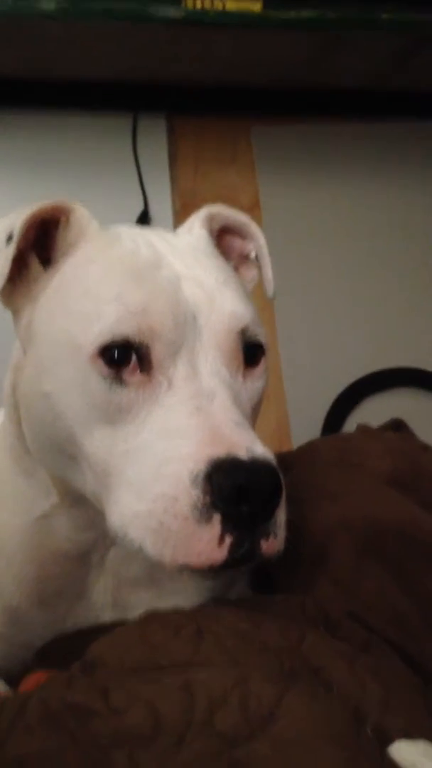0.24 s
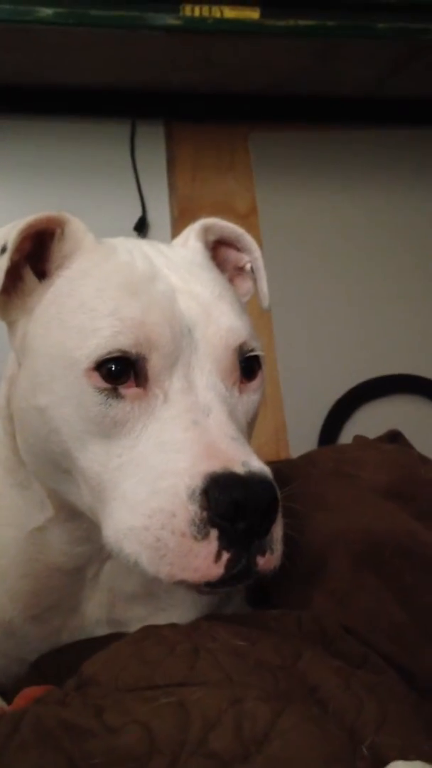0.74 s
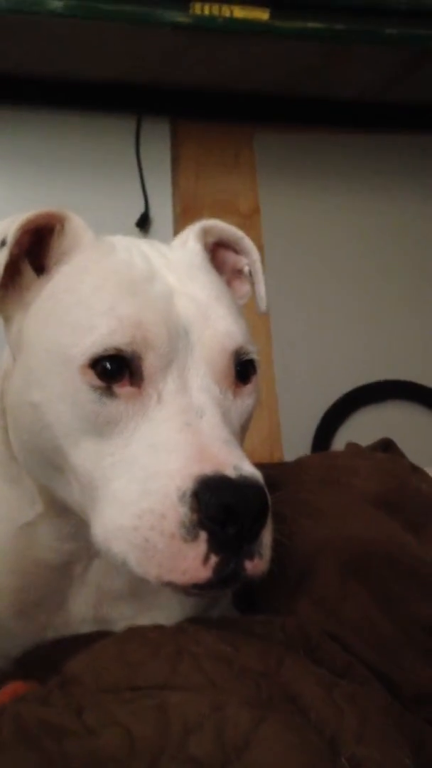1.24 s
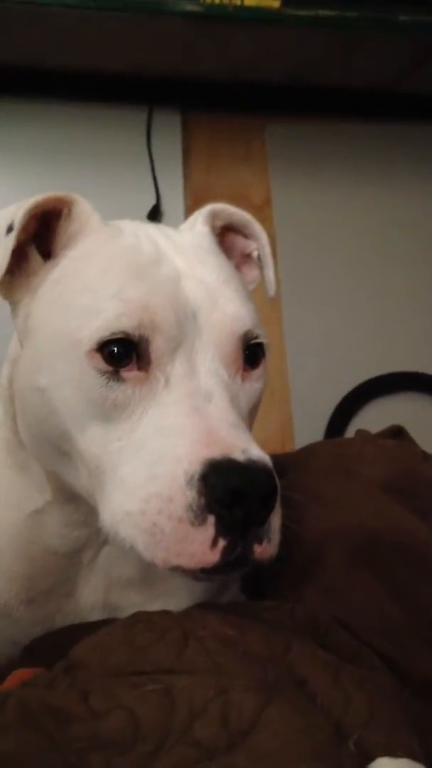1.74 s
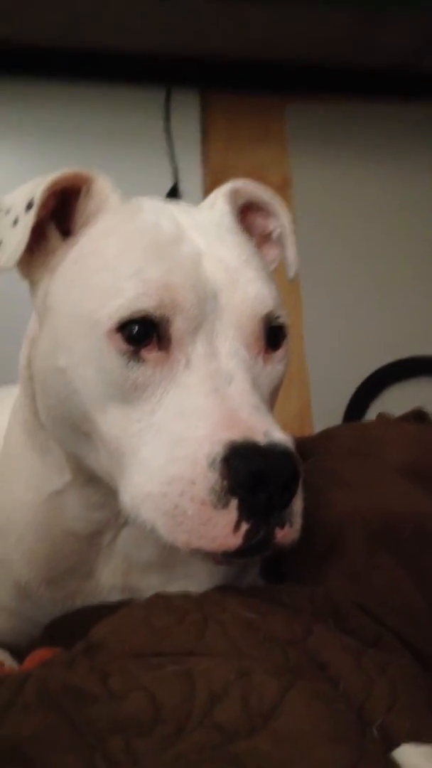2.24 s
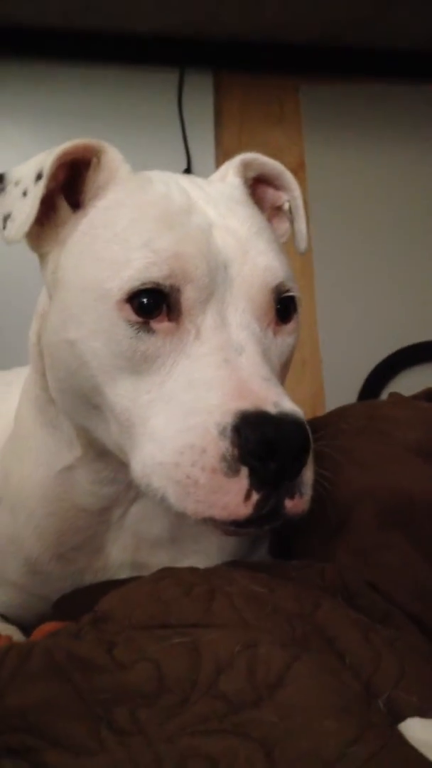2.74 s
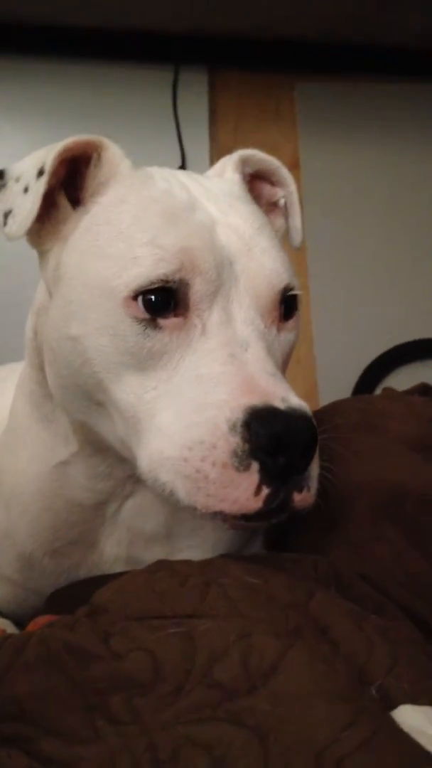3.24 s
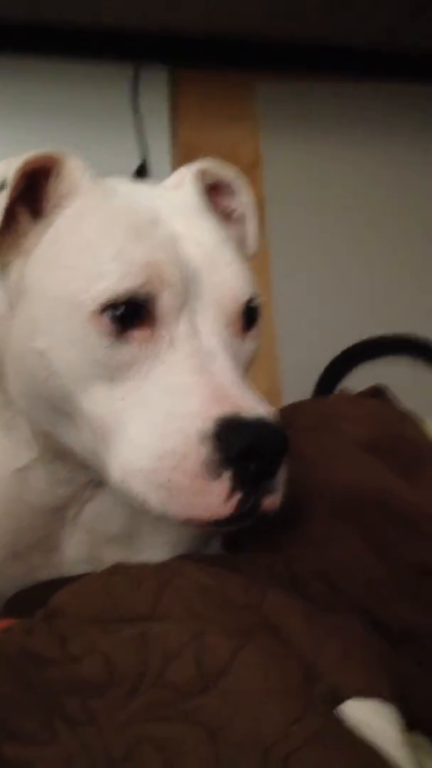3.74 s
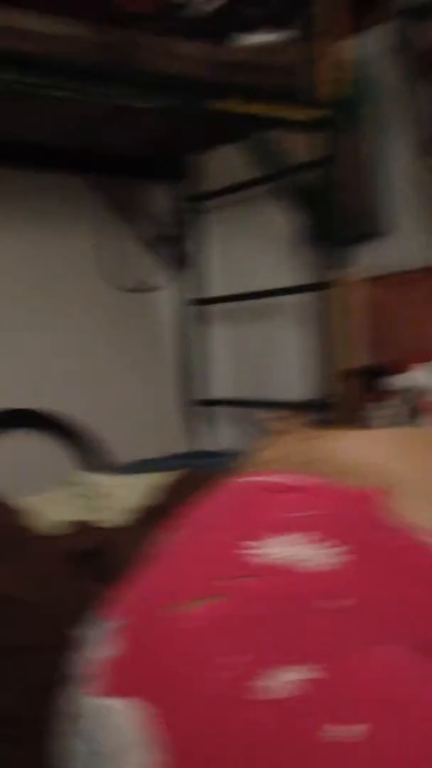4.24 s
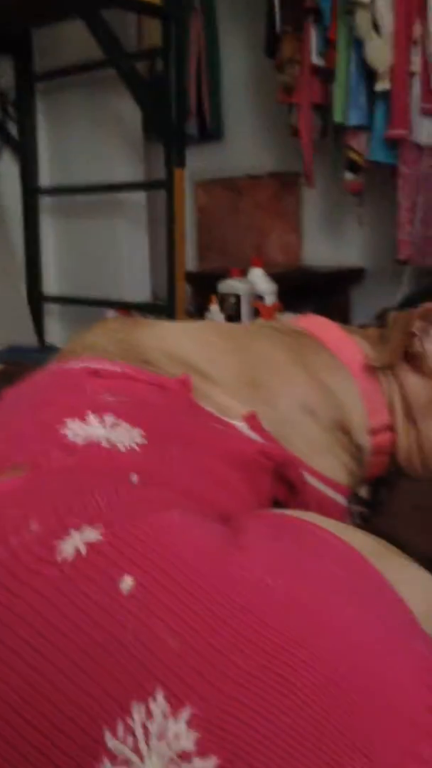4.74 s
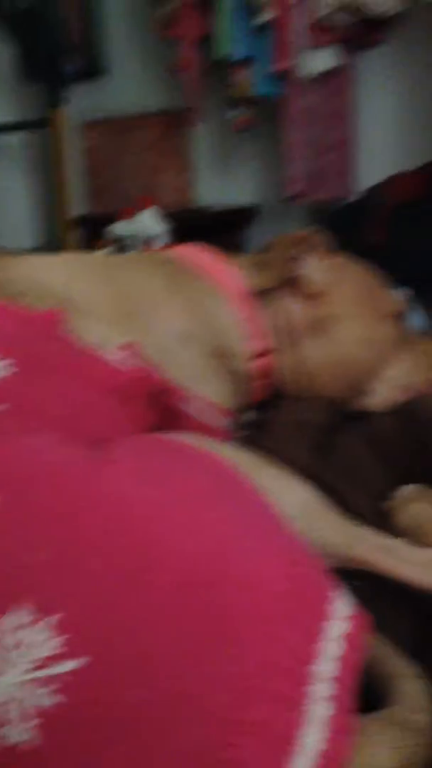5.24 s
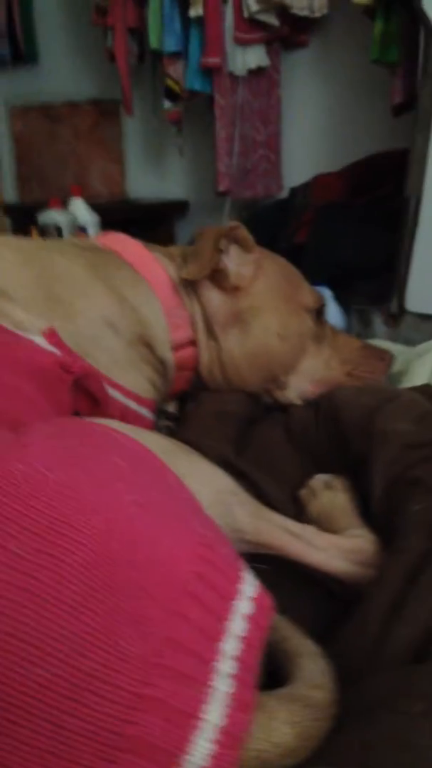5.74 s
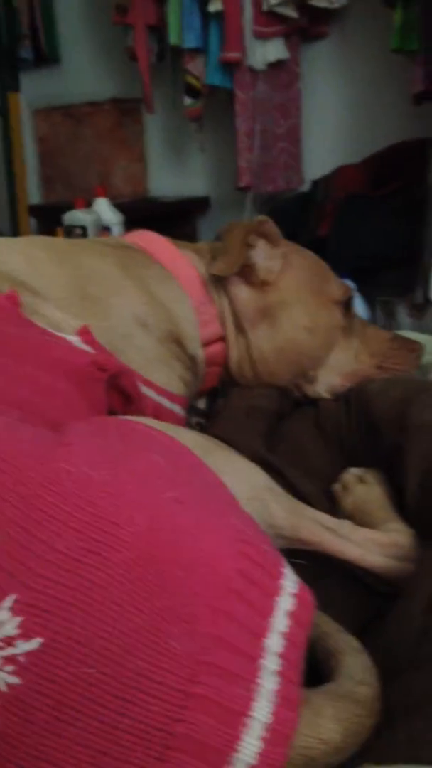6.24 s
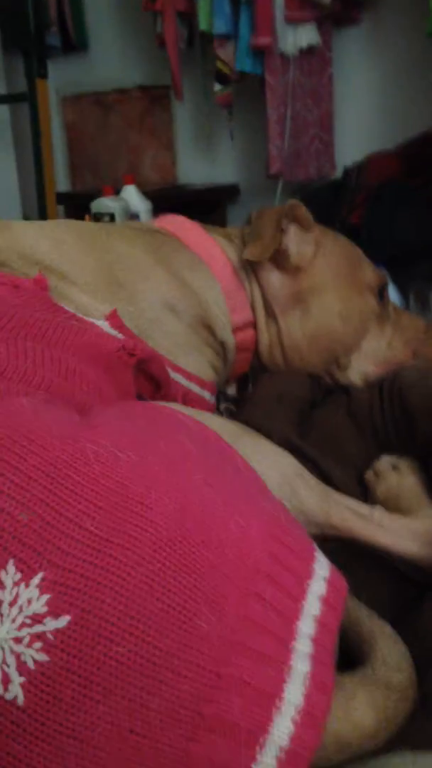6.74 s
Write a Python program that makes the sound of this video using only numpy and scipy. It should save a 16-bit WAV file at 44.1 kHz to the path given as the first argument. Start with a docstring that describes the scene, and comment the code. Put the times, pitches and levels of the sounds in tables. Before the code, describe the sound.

A dog close to a small microphone in a soft, bedding-filled room. Faint puffs lead into a long, low, rumbling growl with irregular wet clicks. One short muffled woof cuts across it, and the growl sinks lower. A quieter, slow rattling breath in follows, then a second growl starts higher and louder, sinking until the end.

```python
"""A dog growls low in a small soft room. Three soft puffs lead into the first long growl, where the vocal
folds beat about 84 to 110 times a second and the soft palate flaps and clicks. One short muffled woof, a hollow
tone with rough mid resonances and a gust of air, cuts across it at 2.4 s. At 3.5 s comes a rattling breath in,
made of slow uneven beats and a faint hiss. The second growl starts higher, near 4.7 s, and lasts to the end."""
import sys
import numpy as np
from scipy import signal
from scipy.io import wavfile
from scipy.ndimage import uniform_filter1d

SR = 44100
rng = np.random.default_rng(int(sys.argv[2]) if len(sys.argv) > 2 else 0)


def wav_out(sig):
    """Save sig, one row per channel (or a flat mono array), as 16-bit PCM at SR to the path in sys.argv[1]."""
    wavfile.write(sys.argv[1], SR, np.round(np.clip(np.atleast_2d(sig).T, -1, 1) * 32767).astype(np.int16))


N = 307377

# the course of each growl; the ring is the sound above the chest tone:
# start_s, pitch_hz, chest_level_db, ring_level_db
GROWL_COURSES = [
    [(0.21, 90.1, -71, -100), (0.25, 89.7, -39.5, -63.5), (0.47, 95.23, -42.5, -54),
     (0.53, 103.8, -34.5, -51), (0.7, 109.9, -31.5, -49), (0.94, 109.9, -34.5, -49),
     (1.26, 104.6, -35.5, -50.5), (1.64, 100.4, -42, -51), (1.9, 102.9, -40.5, -53), (1.97, 93.3, -43, -52),
     (2.43, 92.18, -41, -54.5), (2.68, 84.9, -42, -60), (2.86, 86.3, -40, -58), (3.03, 83.8, -41, -60.5),
     (3.28, 84.46, -43, -62), (3.46, 85.35, -39.5, -57), (3.53, 85.9, -53, -75)],
    [(4.71, 114.9, -71, -110), (4.74, 111.3, -37.5, -57.5), (4.82, 121.8, -32.5, -48.5),
     (5.01, 121.4, -29.5, -49), (5.23, 122.3, -32.5, -50.5), (5.4, 116.8, -37.5, -52),
     (5.75, 114.3, -39, -50.5), (6.09, 115.7, -42.5, -54), (6.14, 107.3, -38, -51.5),
     (6.28, 99.6, -43, -51.5), (6.5, 95.3, -44.5, -54.5), (6.97, 97.05, -43, -52)],
]


def gain_of(db):
    """Turns decibels into amplitude."""
    return 10 ** (np.asarray(db) / 20)


def evened(x):
    """Scales a sound to an average (rms) level of 1."""
    return x / np.sqrt(np.mean(x ** 2) + 1e-20)


def steadied(x):
    """Divides out slow level changes, so that a control curve alone sets the loudness."""
    return x / np.sqrt(uniform_filter1d(x ** 2, SR // 5) + 1e-20)


def add(mix, s, sound):
    """Mixes a sound in at second s."""
    part = mix[round(s * SR):][:len(sound)]
    part += sound[:len(part)]


def unroll(rows):
    """Gives the time axis and every column of a table, sample by sample."""
    s, *columns = np.transpose(rows)
    t = np.arange(s[0], s[-1], 1 / SR)
    return [t] + [np.interp(t, s, column) for column in columns]


def wander(count, seconds):
    """Smooth random curve of rms 1 that changes over about the given time."""
    size = max(round(seconds * SR), 2)
    smooth = uniform_filter1d(rng.standard_normal(count), size)
    return evened(uniform_filter1d(smooth, size))


def beats(turns, spread_db):
    """One click at each full turn, each with its own random strength."""
    whole = np.floor(turns).astype(int)
    strength = gain_of(spread_db * rng.standard_normal(whole[-1] + 1)[whole])
    return np.diff(whole, prepend=whole[0]) * strength


def colour(x, points, causal=1):
    """Filters to a drawn spectrum; causal=1 lets the response only follow, 0 makes it symmetric in time."""
    f, db = np.transpose(points)
    hz = abs(np.fft.fftfreq(16384, 1 / SR))
    log_gain = np.log(gain_of(np.interp(np.log(hz + 1), np.log(f + 1), db)))
    analytic = np.conj(signal.hilbert(log_gain))  # the imaginary part is the phase that fits the gain
    taps = np.fft.ifft(np.exp(analytic.real + 1j * causal * analytic.imag)).real
    return signal.oaconvolve(x, np.fft.fftshift(taps))[len(taps) // 2:][:len(x)]


def resonate(x, hz, width, lag=0):
    """Shifts the curve hz down to zero, smooths twice, and shifts back: a steep resonance of gain 1."""
    turn = np.exp(2j * np.pi * np.cumsum(hz * np.ones(len(x))) / SR)
    r = np.exp(-np.pi * width / SR)
    smooth = signal.lfilter([(1 - r) ** 2], [1, -2 * r, r * r], x / turn + 1e-18)
    return 2 * (turn * np.exp(-1j * lag) * smooth).real


def cavity(x, modes):
    """Hollow space: a sum of fixed resonances with alternating sign."""
    return sum((-1) ** k * gain_of(db) * resonate(x, hz, width) for k, (hz, width, db) in enumerate(modes))


def starting_puffs():
    """Soft puffs before the folds catch: short swells of a 115 Hz tone."""
    # start_s, level_db (at the peak of the swell)
    puff_starts = [(0.117, -57), (0.176, -58.5), (0.2, -60)]
    t = np.arange(SR // 50) / SR
    puff = np.sin(2 * np.pi * 115 * t) * np.hanning(len(t))
    return [(s, gain_of(db) * puff) for s, db in puff_starts]


def fold_beats(hz, rough, narrow):
    """Vocal folds open and shut: turns of their cycle, which drag while the airway is narrow."""
    drag = .14  # share of pitch lost while narrow
    slowed = 1 - drag * (narrow - uniform_filter1d(narrow, SR // 10))
    uneven = 1 + 0.18 * rough * wander(len(hz), 0.0063)
    return 0.7 + np.cumsum(hz * slowed * uneven) / SR


def muzzle_ring(breathy, narrow, muzzle_hz):
    """The muzzle rings on the folds' pulses; its upper resonances throb with the flaps."""
    # lower and upper resonances in turn: pitch_hz, width_hz, gain_db
    muzzle_modes = [(506, 208, 3), (1193, 414, -15.5), (760, 120, -14), (1448, 247, -14.5)]
    throb = gain_of(-4.5 + 11. * narrow)
    lower = cavity(breathy, muzzle_modes[::2])
    upper = cavity(breathy * throb, muzzle_modes[1::2])
    return steadied(lower - upper - resonate(breathy, muzzle_hz, 136))


def whistles(t, airy, puffs, narrow):
    """Air rings in narrow passages that open as the head turns."""
    # one list per passage: start_s, pitch_hz, level_db
    passages = [
        [(5.75, 4020, -78), (5.85, 4050, -74), (6.08, 4700, -77), (6.15, 4066, -77), (6.4, 4137, -82)],
        [(6.1, 1950, -76), (6.15, 1908, -70), (6.42, 2000, -82)],
    ]
    total = np.zeros(len(t))
    for s, pass_hz, db in map(np.transpose, passages):
        blown = airy * (puffs + .02 + 2 * narrow)
        passage = evened(resonate(blown, np.interp(t, s, pass_hz), 260))
        total += gain_of(np.interp(t, s, db, -150, -150)) * passage
    return total


def growl(rows, narrowing):
    """Fold pulses ring chest, throat and muzzle; a puff of air follows each pulse through the nose."""
    # how well each pitch meets the throat, in dB against the ring level:
    # pitch_hz, second_partial_db, throat_ring_db, flap_thud_db
    pitch_fit = [(84.46, 13, 6.2, 14), (94.5, 11, 2.3, 7.5), (102.5, 11, 5.4, 2.5), (104.8, 8, 7.8, 4),
                 (108.8, 6.5, 9.8, 7.5), (113.8, 3, 10.7, -0.5), (120.9, -5, 10.4, 4.5)]
    # tongue and jaw, the last two in dB against the ring level:
    # start_s, muzzle_resonance_hz, roughness (0-1), sinus_db, nose_air_db
    jaw_moves = [(0.25, 687, 0.18, -31, -15.5), (0.5, 701, .15, -28, -19.5), (1.4, 689, 0.12, -22, -21.5),
                 (2.1, 700, 0.12, -32, -23.5), (2.7, 695, 0.24, -22.5, -16.5), (3.5, 663, 0.29, -24, -26.5),
                 (4.72, 802, 0.2, -24, -18.5), (4.899, 679, 0.12, -26.5, -19),
                 (5.402, 580, 0.12, -27.5, -17), (5.9, 682, 0.089, -26.5, -21.5),
                 (6.97, 683, 0.14, -29, -21.5)]
    # resonances of throat, sinus and nose: pitch_hz, width_hz, gain_db (before each sum is steadied)
    throat_modes = [(336, 37.3, 4.5), (382, 70, -11.5)]
    sinus_modes = [(2657, 250, 1.5), (3426, 440, -8)]
    nose_modes = [(4090, 320, -3.5), (5170, 620, 2.5), (5990, 680, -3.5), (8460, 4000, -18.5),
                  (9700, 430, -18), (12350, 1700, -13)]

    t, hz, chest_db, ring_db = unroll(rows)
    pitch, *levels = np.transpose(pitch_fit)
    second_db, throat_db, thud_db = [np.interp(hz, pitch, db) for db in levels]
    s, *moves = np.transpose(jaw_moves)
    muzzle_hz, rough, sinus_db, nose_db = [np.interp(t, s, move) for move in moves]
    narrow = np.interp(t, np.arange(N) / SR, narrowing)

    turns = fold_beats(hz, rough, narrow)
    pulses = beats(turns, 8 * rough) * gain_of(-4.5 * narrow)
    puffs = signal.lfilter([1], [1, -np.exp(-1 / (0.0012 * SR))], pulses)  # each fades over 1.2 ms
    noise = rng.standard_normal(len(t))
    breathy = pulses + .032 * (puffs + .5) * noise
    airy = .5 * pulses + .17 * (puffs ** 2 + .12) * noise

    chest = steadied(resonate(pulses, hz, 85, lag=.45))
    # the pulse that meets a flap thuds in the pharynx
    slaps = -beats(turns, 0) * narrow + 0.0078 * noise
    ring = gain_of(thud_db) * evened(resonate(slaps, 1.5 * hz, 65, lag=.5))
    ring += gain_of(second_db) * steadied(resonate(pulses, 2 * hz, 63, lag=0.18))
    ring += gain_of(throat_db) * steadied(cavity(pulses + .009 * noise, throat_modes))
    ring += muzzle_ring(breathy, narrow, muzzle_hz)
    ring += gain_of(sinus_db) * steadied(cavity(airy, sinus_modes))
    ring += gain_of(nose_db) * steadied(cavity(airy, nose_modes))

    fade = np.minimum(np.minimum(t - t[0], t[-1] - t) / 0.0037, 1)  # 3.7 ms at both ends
    voice = (gain_of(chest_db) * chest + gain_of(ring_db) * ring) * fade
    return t[0], voice + whistles(t, airy, puffs, narrow)


def all_flaps():
    """Lists the strong palate flaps and evenly spaced weaker ones between them."""
    # strong flaps: start_s, click_db (strength before the click resonances)
    strong_flaps = [(0.3562, -89), (0.5684, -60), (0.6519, -56.5), (0.698, -56.5), (0.7435, -60.5),
                    (0.923, -62), (0.9699, -58), (1.0621, -57), (1.165, -59), (1.2599, -60),
                    (1.4069, -61.5), (1.5064, -59.5), (1.6584, -62.5), (1.876, -64.5), (1.9781, -61),
                    (2.1176, -62.5), (2.2933, -60.5), (2.3936, -71.5), (2.4957, -54), (2.6596, -66.5),
                    (2.8036, -70), (2.909, -66), (3.1377, -70.5), (3.4202, -66.5), (3.4923, -72),
                    (4.7814, -65), (4.8595, -57), (4.9823, -60), (5.1098, -60.5), (5.2319, -60.5),
                    (5.3233, -59.5), (5.4952, -62), (5.6806, -69), (5.9578, -60.5), (6.0778, -61),
                    (6.1196, -58.5), (6.3554, -61), (6.5234, -60.5), (6.5764, -60), (6.7903, -63),
                    (6.9452, -60.5)]
    flap_beats, rest_s = 4.8, .6  # flaps come about 4.8 fold beats apart; a gap of rest_s or more is a pause
    weak_db, weak_spread_db = -1.5, 3  # weaker flaps against the mean of their strong neighbours
    s, hz = np.concatenate(GROWL_COURSES)[:, :2].T
    rows = []
    for (start, db), (end, next_db) in zip(strong_flaps, strong_flaps[1:] + strong_flaps[-1:]):
        count = 1
        if end - start < rest_s:
            count = max(round((end - start) * np.interp(start, s, hz) / flap_beats), 1)
        chance = rng.standard_normal(8)[1:count]
        between_db = (db + next_db) / 2 + weak_db - weak_spread_db * abs(chance)
        rows += zip(np.linspace(start, end, count, endpoint=False), np.append(db, between_db))
    return rows


def palate():
    """Each flap of the soft palate narrows the airway for a moment and ends in a wet click."""
    # resonances of the click: pitch_hz, width_hz, gain_db
    click_modes = [(4077, 300, 22.3), (5200, 1400, 21.6), (8120, 410, 14.3)]
    s, db = np.transpose(all_flaps())
    at = np.round(s * SR).astype(int)
    clicks, blows = np.zeros(N), np.zeros(N)
    clicks[at], blows[at] = gain_of(db), 1
    narrowing = signal.oaconvolve(blows, signal.windows.hann(round(.018 * SR)), "same")
    narrowing = np.roll(narrowing, -round(0.0063 * SR))  # narrowest 6.3 ms ahead of the click
    fading = np.exp(-np.arange(400) / (0.00088 * SR))
    burst = signal.oaconvolve(clicks, fading)[:N] * rng.choice([-1., 1.], N)
    return narrowing, cavity(burst, click_modes)


def swell(t, peak_s, db, rise_db_s, hold_s, fall_db_s):
    """Level in dB: straight rise, hold, straight fall."""
    return db - rise_db_s * np.maximum(peak_s - t, 0) - fall_db_s * np.maximum(t - peak_s - hold_s, 0)


def woof():
    """A hollow tone first; the mouth opens on rough mid resonances and lets out a gust of air."""
    # hollow tone: start_s, level_db, pitch_hz
    hollow_tone = [(2.44, -41, 268.8), (2.465, -30, 278.4), (2.482, -30.5, 246.5), (2.498, -19, 239),
                   (2.511, -18.5, 285.5), (2.522, -28.5, 282), (2.538, -22, 273), (2.556, -25, 255),
                   (2.578, -44, 251), (2.61, -37.5, 274.6), (2.72, -67, 260.8)]
    # resonances of the open mouth: pitch_hz, width_hz, gain_db (before the sum is evened)
    mouth_modes = [(135.3, 45, 18), (374, 240, 8.5), (646, 153, -3), (848, 230, 4.5), (1140, 76, -12.5),
                   (1450, 150, -34)]
    # spectrum of the gust: frequency_hz, relative_level_db (per Hz)
    gust_spectrum = [(1000, -81), (1700, 0), (2500, -16.5), (2840, 4.5), (3480, -0.5), (3850, -6),
                     (4220, -5), (4630, -7.5), (15300, -24.5)]
    # level swells of mouth and gust: peak_s, level_db, rise_db_per_s, hold_s, fall_db_per_s
    mouth_swell = (2.514, -25, 1500, .022, 400)
    gust_swell = (2.535, -55, 280, .04, 330)

    t, tone_db, hz = unroll(hollow_tone)
    noise = rng.standard_normal((2, len(t)))
    tone = np.sqrt(2) * np.sin(2 * np.pi * np.cumsum(hz) / SR)
    mouth = evened(cavity(noise[0], mouth_modes))
    air = evened(colour(noise[1], gust_spectrum))
    sound = gain_of(tone_db) * tone
    sound += gain_of(swell(t, *mouth_swell)) * mouth
    sound += gain_of(swell(t, *gust_swell)) * air
    return t[0], sound * signal.windows.tukey(len(t), .2)


def rattle():
    """Breath drawn in over the slack palate: slow uneven beats that even out, with a faint hiss of air."""
    # chest and throat on the breath in: frequency_hz, relative_level_db
    inward_spectrum = [(40, -39), (85, 6), (135, 2.5), (200, -11), (280, 0), (340, -12.5), (430, -18),
                       (700, -32.5), (1200, -18)]
    # hiss resonances: pitch_hz, width_hz, gain_db
    hiss_modes = [(2510, 190, -64), (3500, 690, -66.5), (5250, 410, -80)]
    start_s, length_s, level_db = 3.5, 1.213, -50.5
    rise_s, stop_s = 0.039, 0.049
    sag_s, sag_db, beats_sag = 0.37, -6, 0.11  # level and share of beat rate lost as the breath runs out
    beats_per_s, settle_s = 41.5, .3  # beat rate before the sag
    uneven_start, uneven_end = .25, .05  # spread of the beat rate, as a share of it

    t = np.arange(0, length_s, 1 / SR)
    left = length_s - t
    sag = np.maximum(1 - left / sag_s, 0)
    uneven = uneven_end + (uneven_start - uneven_end) * np.exp(-(t / settle_s) ** 2)
    level = gain_of(level_db + sag_db * sag)
    level = level * np.minimum(np.minimum(t / rise_s, left / stop_s), 1)
    rate = beats_per_s * (1 - beats_sag * sag) * np.maximum(1 + uneven * wander(len(t), 0.015), .2)
    turns = np.cumsum(rate) / SR
    noise = rng.standard_normal(len(t))
    drive = -beats(turns, 1.2 + 5. * uneven) + .012 * noise
    blunt = signal.oaconvolve(drive, np.hanning(round(0.0014 * SR)), "same")  # soft tissue blunts the beats
    thumps = steadied(colour(blunt, inward_spectrum, causal=0.42))
    hiss = cavity(noise, hiss_modes) * signal.windows.tukey(len(t), .25)
    return start_s, level * thumps + hiss


def room(x):
    """Short tail of sparse random echoes: bedding and clothes soak up the sound fast."""
    taps = np.zeros(SR // 3)
    at = np.arange(200, len(taps) - 20, 20) + rng.integers(0, 20, (len(taps) - 201) // 20)
    taps[at] = rng.choice([-1., 1.], len(at)) * gain_of(-60 * at / SR / 0.31)  # 60 dB down in 0.31 s
    # the tail carries little bass
    taps = signal.sosfilt(signal.butter(N=2, Wn=250, btype="high", fs=SR, output="sos"), taps)
    return signal.oaconvolve(x, taps / np.linalg.norm(taps))[:N]


def scene():
    """The dog's puffs, growls, clicks, woof and breath, with the room's echo 14 dB down."""
    narrowing, dog = palate()
    for s, puff in starting_puffs():
        add(dog, s, puff)
    for rows in GROWL_COURSES:
        add(dog, *growl(rows, narrowing))
    add(dog, *woof())
    add(dog, *rattle())
    return (dog + gain_of(-14) * room(dog))[None]


def record(dry):
    """The small microphone drops the deep bass and adds its own quiet noise; then the treble is cut off."""
    # spectrum of the noise: frequency_hz, relative_level_db (per Hz)
    floor_spectrum = [(15, -45), (25, -1), (129, -4.5), (357, -16.5), (492, -14), (798, -21), (963, -24.5),
                      (2460, -28), (2740, -27), (3220, -26), (15300, -34.5)]
    floor_db, edge_hz = -70, 15350
    thin = signal.sosfiltfilt(signal.butter(N=4, Wn=66., btype="high", fs=SR, output="sos"), dry)
    floor = gain_of(floor_db) * evened(colour(rng.standard_normal(N), floor_spectrum))
    band_limit = signal.firwin(511, edge_hz, window=("kaiser", 9), fs=SR)
    return signal.oaconvolve(thin + floor, band_limit[None], "same")


dry = scene()
out = record(dry)
wav_out(out)
```